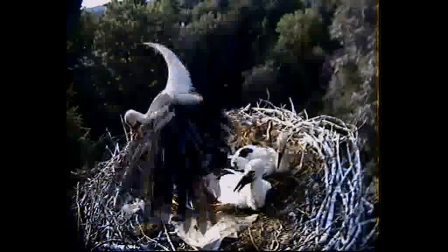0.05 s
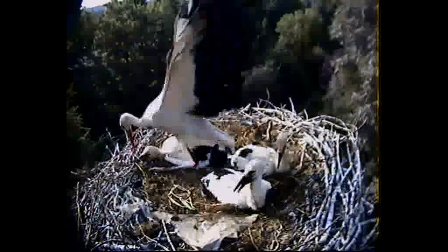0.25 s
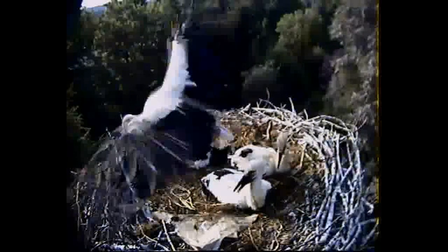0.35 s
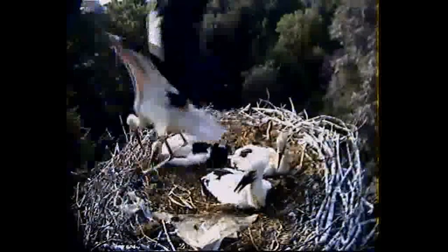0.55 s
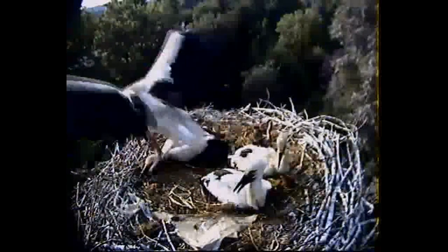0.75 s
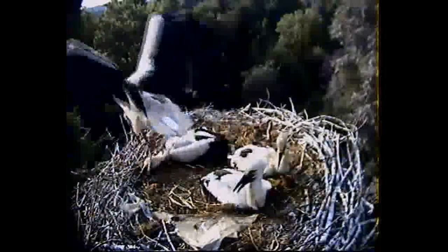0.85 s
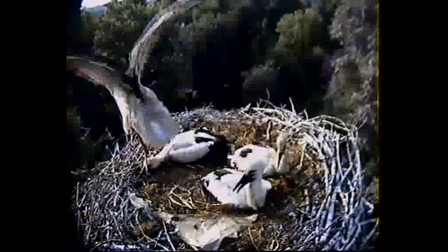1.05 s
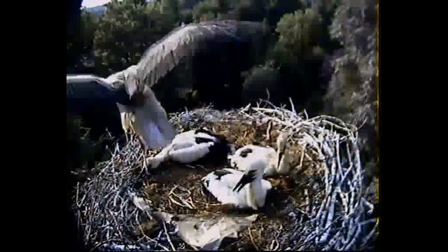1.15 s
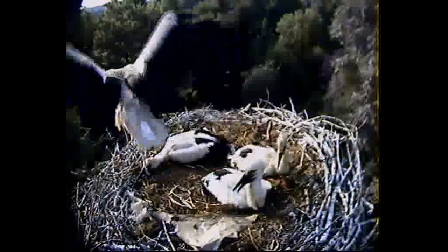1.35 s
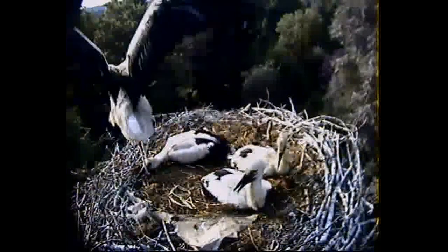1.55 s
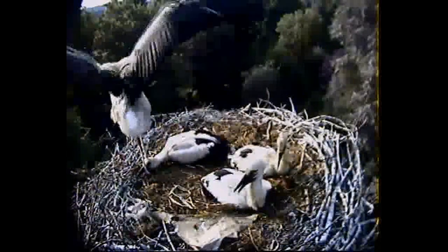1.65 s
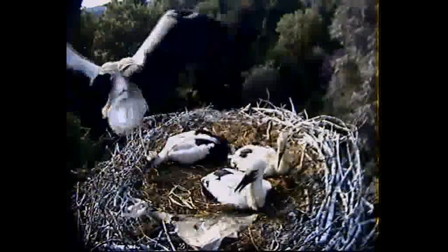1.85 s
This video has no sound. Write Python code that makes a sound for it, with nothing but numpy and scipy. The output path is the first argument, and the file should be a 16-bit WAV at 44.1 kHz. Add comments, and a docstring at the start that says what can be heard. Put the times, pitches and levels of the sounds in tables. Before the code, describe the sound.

A young stork squeals three times, at about 0.25, 0.55 and 0.9 seconds, each under 0.2 seconds, jumping from rough croak to thin breathy whistle and dropping back hoarse. One loud, dry wooden bill clack snaps at 0.49. Soft feathery wing strokes and a low whoosh swell during the first second, strongest near 0.5. Afterwards only quiet rumbling open air remains, with faint twig ticks at 1.3, 1.5 and 1.8.

```python
"""A stork's nest, close up: a young stork squeals three times, rising from croak to whistle and back.
Each squeal layers an unsteady tone, a throat rasp and a hiss, with a weaker second tone beneath.
One sharp wooden clack, like a bill snapping shut, is a burst of pulses between the first two squeals.
An adult's wings are swelling noise and a low sliding whoosh; twigs tick as small pulses.
Coloured noise and two wavering low tones make the open air and distant rumble, under a faint high whine."""
import sys
import numpy as np
from scipy import signal
from scipy.fft import rfft, irfft, next_fast_len
from scipy.io import wavfile
from scipy.ndimage import map_coordinates

SR = 44100
rng = np.random.default_rng(int(sys.argv[2]) if len(sys.argv) > 2 else 0)


def store_pcm(level_fs):
    """Save levels as 16-bit WAV."""
    pcm = np.round(np.clip(level_fs, -1, 1) * 32767).astype(np.int16)
    wavfile.write(sys.argv[1], SR, np.atleast_2d(pcm).T)


N = 81585  # length in samples


def amp(db):
    """Decibels to gain."""
    return 10 ** (np.asarray(db) / 20)


def unit(x):
    """Scale to rms 1."""
    return x / np.sqrt(np.mean(x ** 2) + 1e-20)


def along(points, hz):
    """Read a spectrum of (hz, level_db) points on a log frequency axis."""
    point_hz, level_db = np.transpose(points)
    return np.interp(np.log(hz + 1), np.log(point_hz + 1), level_db)


def wobble(rate):
    """A smooth random curve through rate random knots a second."""
    return map_coordinates(rng.standard_normal(N // 8), [np.arange(N) * rate / SR], mode="wrap")


def filtered(x, response):
    """Multiply the spectrum of x by a response of frequency."""
    size = next_fast_len(N + SR // 2)
    hz = np.fft.rfftfreq(size, 1 / SR)
    return irfft(rfft(x, size) * response(hz), size)[:N]


def noise(spectrum):
    """Noise of rms 1 with the given colour."""
    return unit(filtered(rng.standard_normal(N), lambda hz: amp(along(spectrum, hz))))


def band(centre, width):
    """Noise of rms 1 through two identical resonances in a row, for steep sides."""
    def response(hz):
        return (hz * width / (centre ** 2 - hz * hz + 1j * hz * width)) ** 2
    return unit(filtered(rng.standard_normal(N), response))


def curves(rows):
    """One value per sample for each column after the time."""
    s, *columns = np.transpose(rows)
    return [np.interp(np.arange(N) / SR, s, column) for column in columns]


def fade(first_s, last_s, edge_s):
    """Full between two times, with a short ramp outside them."""
    t = np.arange(N) / SR
    return np.clip(np.minimum(t - first_s, last_s - t) / edge_s + 1, 0, 1)


# colour of the open air: hz, level_db (relative, per Hz)
AIR_COLOUR = [(20, -10.5), (60, -3), (95, -9), (170, -13.5), (250, -12), (400, -16.5), (650, -21),
              (1100, -16.5), (1900, -25.5), (2600, -32.5), (4500, -37), (9700, -40)]
# distant low hum: pitch_hz, level_db (rms, before it wavers)
HUM_TONES = [(50, -61.5), (68, -57.5)]
AIR_DB = -50.5  # rms level of the open air


def distance():
    """Open air as rumbling noise, plus low tones that waver in level and phase."""
    t = np.arange(N) / SR
    hum = np.zeros(N)
    for hz, db in HUM_TONES:
        level = amp(db + 1.7 * wobble(8.67))
        hum += level * np.sqrt(2) * np.sin(2 * np.pi * hz * t + 1.5 * wobble(5.92))
    return amp(AIR_DB) * noise(AIR_COLOUR) + hum


# wing strokes: centre_s, half_length_s (to 1/e of the peak), swish_db, draught_db (peaks of the swells)
WING_STROKES = [(0.081, 0.21, -57.5, -51), (0.371, 0.053, -54, -54.5), (0.536, 0.066, -48, -48),
                (0.705, 0.042, -55, -49), (0.924, 0.33, -60.5, -56)]
# colour of the feather swish: hz, level_db (relative, per Hz)
FEATHER_COLOUR = [(100, -6), (400, -0.5), (1000, -6.5), (2500, -3.5), (5000, -5), (8000, -5), (9800, -10.5)]
# colour of the low draught: hz, level_db (relative, per Hz)
DRAUGHT_COLOUR = [(20, -6.5), (45, 7.5), (80, -9.5), (125, -2.5), (250, -22), (600, -56)]


def wings():
    """Each stroke swells a flickering swish of air through feathers and a low push of air."""
    t = np.arange(N) / SR
    swish, push = np.zeros(N), np.zeros(N)
    for centre_s, half_s, swish_db, draught_db in WING_STROKES:
        swell = np.exp(-((t - centre_s) / half_s) ** 2)
        swish += amp(swish_db) * swell
        push += amp(draught_db) * swell
    flicker = amp(1.4 * wobble(140))
    return swish * noise(FEATHER_COLOUR) * flicker + push * noise(DRAUGHT_COLOUR)


GAPS_PER_S, GAPS_DB = 190, 5  # random knots a second; swing limit either way before levelling
JITTER_PER_S, SHIMMER_DB = 650, 0.3  # knots a second and depth of the voice's unsteadiness
EDGE_S = .004  # ramp outside each call


def gaps():
    """A gain of rms 1 that makes a tone come and go."""
    return unit(amp(GAPS_DB * np.tanh(wobble(GAPS_PER_S))))


def voice(pitch, jitter, octave_db):
    """A tone, unsteady in pitch and strength, with an octave overtone that comes and goes."""
    unsteady_hz = pitch * (1 + jitter * wobble(JITTER_PER_S))
    phase = 2 * np.pi * np.cumsum(unsteady_hz) / SR
    overtone = amp(octave_db) * gaps() * np.sin(2 * phase)
    shimmer = amp(SHIMMER_DB * wobble(JITTER_PER_S))
    return np.sqrt(2) * (np.sin(phase) + overtone) * shimmer


# one table per squeal: time_s, pitch_hz, whistle_db (before the tone drops out), rasp_db, hiss_db
SQUEAL_CURVES = [
    [(.242, 1182, -65, -45.5, -72), (.246, 1600, -34, -38, -62), (.256, 1650, -31, -39, -56),
     (.259, 3950, -45, -41, -55), (.268, 4030, -42, -38, -59), (.279, 4150, -52, -40.5, -50),
     (.302, 4200, -58, -42, -52.5), (.311, 4280, -45, -39, -48.5), (.319, 4130, -42, -42, -44.5),
     (.325, 3400, -32, -34.5, -56), (.328, 1790, -32, -44, -46), (.343, 1500, -37.5, -37, -49.5),
     (.362, 1445, -50, -42.5, -59), (.39, 1232, -58, -63, -65)],
    [(.529, 895.7, -63, -46.5, -53), (.537, 1600, -33, -50.5, -56), (.545, 1699, -51, -33.5, -53.5),
     (.548, 3250, -30, -41, -53), (.553, 3376, -36, -43, -46), (.559, 3880, -34.5, -39.5, -47),
     (.571, 4015, -31.5, -44, -45), (.582, 4070, -28, -43.5, -46), (.593, 3900, -29, -37, -40),
     (.601, 3938, -35.5, -43, -36), (.603, 3115, -24.5, -38.5, -37), (.611, 3160, -26.5, -41, -40),
     (.614, 1486, -36.5, -40, -38), (.630, 1300, -47.5, -45.5, -49.5), (.66, 900, -64, -59, -57)],
    [(.897, 599, -64, -46, -50.5), (.903, 1196, -53.5, -42.5, -45.5), (.909, 3393, -30, -39, -42),
     (.917, 3670, -28.5, -47, -42.5), (.927, 3774, -24.5, -45, -40), (.936, 4022, -30.5, -43.5, -37),
     (.950, 4086, -29.5, -48, -46), (.959, 3948, -28.5, -51, -40.5), (.967, 3593, -24.5, -44, -40),
     (.977, 3528, -34.5, -42.5, -42), (.983, 1736, -55, -43, -38), (.992, 1445, -43.5, -40, -44.5),
     (1.008, 685, -62, -45.5, -53), (1.035, 302, -66, -55.5, -81)],
]
# steady pitch jitter, one value per squeal: jitter (share of the pitch)
HOARSENESS = [0.011, 0.0065, 0.01]
# throat resonances: centre_hz, width_hz (doubled for each of two passes), weight_db (relative)
THROAT_RESONANCES = [(274, 61, -1.5), (540, 156, -5.5), (813, 100, -10), (1300, 52, -11.5),
                     (1600, 226, 1.5), (1970, 190, -1.5), (2547, 180, 6), (3300, 390, 5.5), (4040, 240, 3)]
# colour of the breathy hiss: hz, level_db (relative, per Hz)
HISS_COLOUR = [(1000, -34), (3500, 3.5), (4800, 0), (5600, 4.5), (6300, 1), (7000, 0.5), (8100, -1),
               (8800, -1), (9600, -36.5), (13000, -9.5)]
# the rasp gathers below the pitch: centre (share of pitch), spread in octaves, floor far away in dB
RASP_CENTRE, RASP_OCTAVES, RASP_SKIRT_DB = 0.62, 0.74, -24.5
CROAK_HZ = 2040  # around and below this pitch the voice roughens
CROAK_JITTER, TAIL_JITTER = 0.048, .085  # added jitter; extra toward the closing croak (share of pitch)
# the tone drops out while it jumps between croak and whistle
BREAK_HZ, BREAK_OCTAVES, BREAK_DB = 2450, 0.31, -22
OCTAVE_DB, HARSH_HISS_DB = -6, -38  # overtone re the tone when the hiss is at the second level
FLUTTER_PER_S, FLUTTER_DB = 1000, -0.5  # grain of rasp and hiss: knots a second, depth


def throat_rasp(pitch):
    """Noise in the throat resonances, strongest in those nearest a point below the pitch."""
    weights, bands = [], []
    for hz, width, db in THROAT_RESONANCES:
        octaves_off = np.log2(hz / (RASP_CENTRE * pitch))
        nearness = amp(RASP_SKIRT_DB) + np.exp(-.5 * (octaves_off / RASP_OCTAVES) ** 2)
        weights.append(amp(db) * nearness)
        bands.append(band(hz, 2 * width))
    weights = np.array(weights)
    return (weights * bands).sum(0) / np.linalg.norm(weights, axis=0)


def squeal(rows, jitter):
    """A whistle on an arching pitch that ends in a rough croak, with throat rasp and breathy hiss."""
    pitch, whistle_db, rasp_db, hiss_db = curves(rows)
    start, end = rows[0][0], rows[-1][0]
    progress = np.clip((np.arange(N) / SR - start) / (end - start), 0, 1)
    croak = 1 / (1 + (pitch / CROAK_HZ) ** 6)
    breaking = np.exp(-.5 * (np.log2(pitch / BREAK_HZ) / BREAK_OCTAVES) ** 2)
    roughness = jitter + CROAK_JITTER * (croak + breaking) + TAIL_JITTER * croak * progress ** 2
    # a stronger hiss brings a stronger overtone
    whistle = voice(pitch, roughness, OCTAVE_DB + hiss_db - HARSH_HISS_DB)
    whistle *= amp(BREAK_DB * breaking)
    breath = amp(rasp_db) * throat_rasp(pitch) + amp(hiss_db) * noise(HISS_COLOUR)
    flutter = unit(amp(FLUTTER_DB * wobble(FLUTTER_PER_S)))
    return fade(start, end, EDGE_S) * (amp(whistle_db) * whistle + flutter * breath)


# weaker tone under the whistle, one table per squeal: time_s, pitch_hz, level_db, overtone_db
SECOND_VOICE_CURVES = [
    [(.253, 3310, -37, -63), (.267, 3430, -44, -61), (.293, 3295, -40, -61), (.309, 3175, -47, -59)],
    [(.556, 3580, -57, -49.5), (.577, 3260, -54, -43), (.594, 3220, -50, -42.5), (.613, 2750, -48, -51)],
    [(.908, 2800, -52, -52), (.938, 3180, -46, -49), (.978, 2950, -60, -42.5)],
]
SECOND_JITTER = .017  # share of the pitch


def second_voice(rows):
    """A weaker, broken tone that drifts on its own pitch while the whistle sounds."""
    pitch, level_db, overtone_db = curves(rows)
    tone = voice(pitch, SECOND_JITTER, overtone_db - level_db)
    return fade(rows[0][0], rows[-1][0], EDGE_S) * amp(level_db) * gaps() * tone


# low whoosh of the passing wings: time_s, centre_hz, level_db
WHOOSH_CURVE = [(.33, 150, -64), (.51, 80, -47.5), (.61, 150.1, -53.5), (.71, 150.3, -55), (.83, 120, -71)]
WHOOSH_KNOTS_PER_S = 75  # faster knots make a wider band


def whoosh():
    """A low band of turbulence whose centre slides down and up as the wings sweep past."""
    centre, level_db = curves(WHOOSH_CURVE)
    phase = 2 * np.pi * np.cumsum(centre) / SR
    sine_part = wobble(WHOOSH_KNOTS_PER_S) * np.sin(phase)
    cosine_part = wobble(WHOOSH_KNOTS_PER_S) * np.cos(phase)
    return amp(level_db) * unit(sine_part + cosine_part)


# decay time to -60 dB and energy relative to the pulse: brief rattle, then scatter from the nest
CLACK_T60_S, CLACK_TAIL_DB, NEST_T60_S, NEST_DB = 0.035, -6.5, 0.098, -12.5
RATTLE_LOW_HZ = 900  # both tails have little body below this


def knocks(rows, colour, size=4096):
    """Hard contacts on dead wood: a pulse, a brief rattle and a faint scatter from the nest."""
    # minimum phase gathers the coloured pulse at its onset
    cepstrum = irfft(np.log(amp(along(colour, np.fft.rfftfreq(size, 1 / SR)))))
    cepstrum[1:size // 2] *= 2
    cepstrum[size // 2:] = 0
    pulse = irfft(np.exp(rfft(cepstrum)))
    pulse /= np.abs(pulse).max()
    t, out = np.arange(size) / SR, np.zeros(N + size)
    thin = signal.butter(1, RATTLE_LOW_HZ, "high", fs=SR)
    for s, db in rows:
        blow = (t == 0) * 1.
        for t60, tail_db in (CLACK_T60_S, CLACK_TAIL_DB), (NEST_T60_S, NEST_DB):
            decay = np.exp(-np.log(1000) * t / t60)
            tail = signal.lfilter(*thin, rng.standard_normal(size) * decay)
            blow = blow + amp(tail_db) * tail / np.linalg.norm(tail)
        out[round(s * SR):][:size] -= amp(db) * blow
    return signal.fftconvolve(out, pulse)[:N]


# contacts within the one clack: start_s, level_db (peak of the bare pulse)
CLACK_CONTACTS = [(.4884, -21), (.4914, -5.5), (.4939, -23), (.4957, -23.5), (.4987, -31)]
# colour of the clack: hz, level_db (relative)
CLACK_SPECTRUM = [(60, -5), (190, -7.5), (300, 3.5), (460, 0), (590, 3), (730, -13), (930, -1.5),
                  (1500, -1.5), (1900, -3), (2450, 0), (3200, 1), (4100, -11), (5600, -13), (6400, -8.5),
                  (8200, -11), (9800, -22.5), (13000, -17.5)]


def clack():
    """One strong wooden contact among weaker ones, milliseconds apart, heard as a single snap."""
    return knocks(CLACK_CONTACTS, CLACK_SPECTRUM)


# twig ticks: start_s, level_db (peak of the bare pulse)
TWIG_TICKS = [(.696, -42), (1.335, -41), (1.5131, -39.5), (1.7959, -41)]
# colour of a tick: hz, level_db (relative)
TWIG_SPECTRUM = [(200, -8), (1200, 13.5), (2500, -5), (5000, -4.5), (9000, -7.5), (12000, -57)]


def twigs():
    """Small, separate contacts on dry wood."""
    return knocks(TWIG_TICKS, TWIG_SPECTRUM)


def scene():
    """Mix squeals, clack, twigs, wings and background."""
    calls = sum(squeal(rows, jitter) for rows, jitter in zip(SQUEAL_CURVES, HOARSENESS))
    calls = calls + sum(second_voice(rows) for rows in SECOND_VOICE_CURVES)
    return (distance() + wings() + calls + whoosh() + clack() + twigs())[None]


TOP_HZ, LEAK_TOP_HZ, LEAK_DB = 9900, 13800, -24  # main treble limit; limit and level of the trace added
WHINE_HZ, WHINE_DB = 11025, -88.5  # rms level


def record(dry):
    """Cut the treble steeply, leaving a trace of it and a faint steady whine above the main limit."""
    def cut(hz, top):
        return 1 / np.sqrt(1 + (hz / top) ** 100)
    sound = filtered(dry[0], lambda hz: cut(hz, TOP_HZ) + amp(LEAK_DB))
    whine = amp(WHINE_DB) * np.sqrt(2) * np.sin(2 * np.pi * WHINE_HZ * np.arange(N) / SR)
    return filtered(sound + whine, lambda hz: cut(hz, LEAK_TOP_HZ))[None]


dry = scene()
out = record(dry)
store_pcm(out)
```